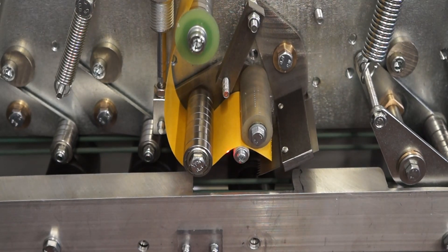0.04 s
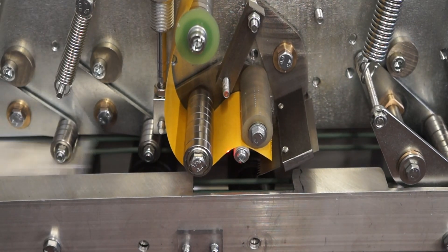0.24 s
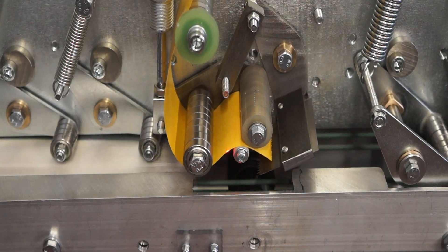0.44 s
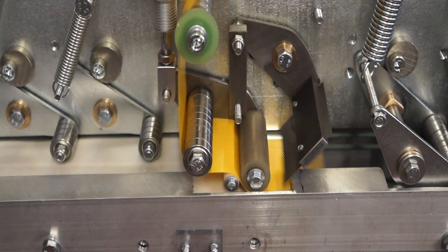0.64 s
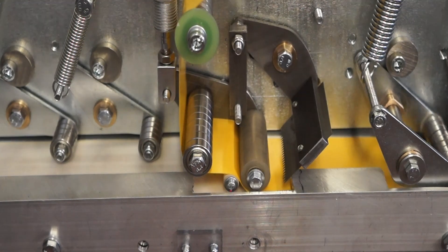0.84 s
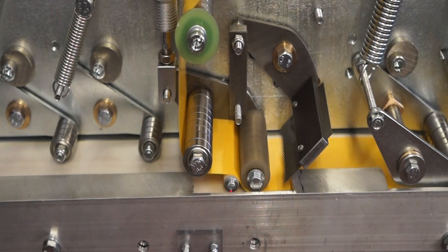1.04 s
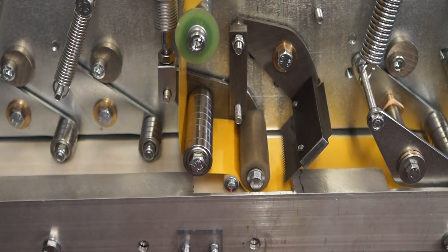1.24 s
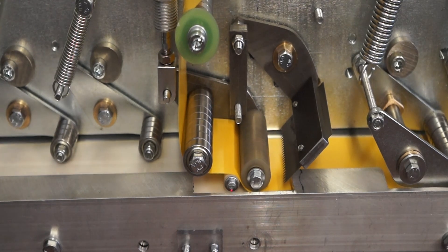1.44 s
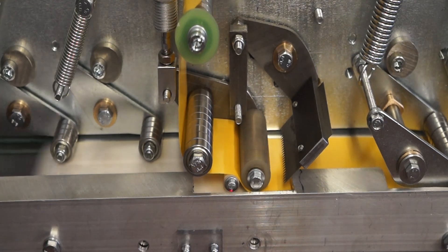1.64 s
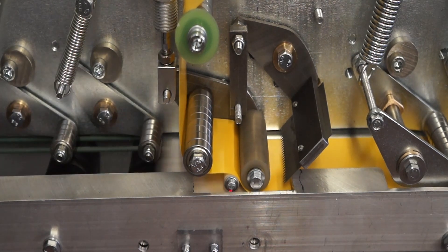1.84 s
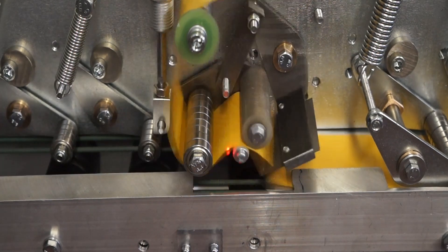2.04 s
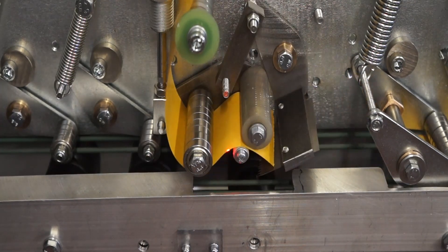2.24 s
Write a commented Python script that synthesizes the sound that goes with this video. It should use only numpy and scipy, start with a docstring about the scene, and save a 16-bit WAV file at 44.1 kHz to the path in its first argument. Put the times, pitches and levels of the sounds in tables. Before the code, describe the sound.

Sticky tape crackles off a machine's roll between the clacks of a steel applicator arm.

```python
"""Sticky tape crackles off the roll of an applicator, close up in a workshop: threads of glue let go
in thousands of tiny snaps. First the steel arm clacks down on a board that scrapes in; the rollers
rumble and knock as the tape runs, then the arm snaps back up and the frame shudders.
Behind it a small air leak hisses and whistles over the hum of the machines."""
import sys
import numpy as np
from scipy import signal
from scipy.fft import rfft, irfft, next_fast_len
from scipy.io import wavfile
from scipy.ndimage import map_coordinates

SR = 44100
rng = np.random.default_rng(int(sys.argv[2]) if len(sys.argv) > 2 else 0)


def file_out(sig):
    """Save sig as 16-bit WAV at sys.argv[1]."""
    # one column per channel
    cols = np.atleast_2d(sig).T
    # limit, then scale
    lim = np.clip(cols, -1, 1)
    pcm = np.round(lim * 32767).astype(np.int16)
    wavfile.write(sys.argv[1], SR, pcm)


N = 105840


def amp(db):
    """Decibels to gain."""
    return 10 ** (np.asarray(db) / 20)


def unit(x):
    """Scale to rms 1."""
    return x / np.sqrt(np.mean(x ** 2) + 1e-20)


def along(points, hz):
    """Read a curve of (f/Hz, value) points on a log frequency axis."""
    f, v = np.transpose(points)
    return np.interp(np.log(hz + 1), np.log(f + 1), v)


def fader(points):
    """Gain per sample from (t/s, level/dB) points."""
    return amp(np.interp(np.arange(N) / SR, *np.transpose(points)))


def wobble(hz):
    """A smooth random curve with hz knots a second."""
    return map_coordinates(rng.standard_normal(2000), [np.arange(N) * hz / SR], mode="wrap")


def swell(s, width_s):
    """A bell-shaped rise and fall around time s."""
    return np.exp(-((np.arange(N) / SR - s) / width_s) ** 2 / 2)


def strike(s, t60, attack_s):
    """Time since a blow at s, and its envelope."""
    t = np.maximum(np.arange(N) / SR - s, 0)
    decay = np.exp(-np.log(1000) * np.minimum(t / t60, 2)) * (t < 2 * t60)
    return t, decay * (1 - np.exp(-t / attack_s))


def filtered(x, response):
    """Filter x by a gain given as a function of frequency."""
    size = next_fast_len(N + SR // 2)
    return irfft(rfft(x, size) * response(np.fft.rfftfreq(size, 1 / SR)), size)[..., :N]


def colour(x, eq):
    """Minimum-phase EQ from (f/Hz, level/dB) points, scaled to rms 1."""
    def response(hz):
        cepstrum = irfft(np.log(amp(along(eq, hz))))
        cepstrum[len(cepstrum) // 2:] = 0
        return np.exp(2 * rfft(cepstrum) - cepstrum[0])
    return unit(filtered(x, response))


def noise(eq):
    """Coloured noise of rms 1."""
    return colour(rng.standard_normal(N), eq)


def tones(rows, waver):
    """Sines from (f/Hz, level/dB) rows; their phase wanders by about waver radians."""
    t = np.arange(N) / SR
    return sum(np.sqrt(2) * amp(db) * np.sin(2 * np.pi * hz * t + waver * wobble(10)) for hz, db in rows)


def room(x):
    """The workshop's diffuse tail, ringing longest in the treble."""
    decay = [(200, 0.13), (2000, 0.23), (5000, 0.35), (10000, 0.2)]  # reverb time: f/Hz, t60/s
    hz, t, spectrum = signal.stft(rng.standard_normal(SR // 2), SR, nperseg=256)
    fade = np.exp(-np.log(1000) * t / along(decay, hz)[:, None])
    tail = signal.istft(spectrum * fade, SR, nperseg=256)[1]
    return signal.fftconvolve(x, tail / np.linalg.norm(tail))[:N]


def machines():
    """Workshop machines lay down a bed of noise and a faint hum."""
    bed_eq = [(25, -21), (70, -11.5), (105, -14.5), (130, -3), (175, -1), (250, 3.5), (300, 5.5),
              (345, 2.5), (410, -8.5), (570, 2), (700, 0), (1000, -4.5), (1450, -4), (1800, 3),
              (2400, -2.5), (3200, -2.5), (4600, -15), (6500, -10.5), (11000, -12)]  # machine noise: f/Hz, level/dB
    bed_ride = [(0, -42), (.55, -37), (.66, -45), (2.1, -41.5), (2.3, -45.5)]  # its loudness: t/s, level/dB
    hum = [(154, -75), (227, -59.5), (276, -61)]  # hum lines: f/Hz, level/dB
    return noise(bed_eq) * fader(bed_ride) + tones(hum, waver=.8)


def air_leak():
    """Escaping air hisses and whistles."""
    hiss_eq = [(2000, -16), (5000, -0.5), (6900, -3.5), (7300, 11), (8000, 11), (8700, 8), (9300, -18),
               (11000, -25)]  # hiss: f/Hz, level/dB
    whistles = [(1803, -12), (2169, -10), (3257, -16), (7144, -11.5), (7246, -10.5), (8010, -11),
                (8672, -8.5)]  # whistles: f/Hz, level/dB relative to the hiss
    ride = [(0, -37), (.65, -48), (2.1, -43), (2.3, -55.5)]  # loudness of both: t/s, level/dB
    return (noise(hiss_eq) + tones(whistles, waver=.24)) * fader(ride)


def board():
    """The board scrapes under the first roller and rumbles unevenly through."""
    rumble_eq = [(40, -16), (90, -11.5), (130, -1), (175, -2), (260, 8), (310, -4.5), (430, 3.5),
                 (510, -5.5), (610, 2.5), (720, -3), (1000, 1), (1700, -4.5), (3000, -2), (9000, -18)]  # board on rollers: f/Hz, level/dB
    rumble_ride = [(.2, -42), (.3, -30), (.39, -51), (.43, -31.5), (.52, -34), (.6, -41), (.64, -49),
                   (.87, -49.5), (.95, -36), (1.1, -33.5), (1.22, -39.5), (1.33, -33.5), (1.45, -41),
                   (1.65, -45.5), (1.9, -36.5), (1.98, -42), (2.13, -35), (2.24, -48.5), (2.28, -56)]  # its loudness: t/s, level/dB
    scrape_eq = [(300, -15), (1200, -2), (1700, 7), (2100, -3.5), (2550, -9), (3400, -3), (5000, -1),
                 (11000, -11.5)]  # sliding friction: f/Hz, level/dB
    swing_db, scrape_db = 3.2, -31.5
    rumble = unit(noise(rumble_eq) * amp(swing_db * np.tanh(wobble(hz=50))))
    scrape = amp(scrape_db + 2.1 * wobble(hz=78.5)) * swell(.466, width_s=.039) * noise(scrape_eq)
    return rumble * fader(rumble_ride) + scrape


def knocks():
    """Arm, board and rollers knock: each a well damped resonance with a rattle around it."""
    hits = [(.2372, -15, 2600, .03), (.254, -17, 1077, .04), (.4008, -12, 1520, .013),
            (.405, -23, 570, .03), (.5628, -10, 540, .015), (.912, -23.5, 620, .04), (.953, -26, 440, .04),
            (1.105, -28, 740, .04), (1.252, -29, 480, .035), (1.315, -28, 1000, .05),
            (1.326, -26, 480, .05), (1.723, -23, 1800, .025), (1.724, -28, 700, .035),
            (1.8765, -7.5, 1570, .016), (1.879, -27, 580, .04), (2.0362, -14.5, 540, .015),
            (2.064, -17, 1750, .025), (2.083, -18, 3150, .025), (2.233, -34, 900, .04)]  # knocks: t/s, level/dB, f/Hz, t60/s
    rattle_db, rattle_width = -5.5, .5  # width in natural-log frequency
    out = np.zeros(N)
    for s, db, hz, t60 in hits:
        t, env = strike(s, t60, attack_s=.0005)
        band = lambda f: 1 / (1 + (np.log((f + 1) / hz) / rattle_width) ** 2) ** 2
        rattle = unit(filtered(rng.standard_normal(N), band))
        out += amp(db) * env * (np.sin(2 * np.pi * hz * t) + amp(rattle_db) * rattle)
    low_cut = signal.butter(2, 270, "high", fs=SR, output="sos")  # small parts radiate little bass
    return signal.sosfilt(low_cut, out)


def frame():
    """The frame shudders in a few low modes."""
    shudders = [(0.255, -18.5), (1.321, -35.5), (2.361, -27.5)]  # jolts: t/s, level/dB
    modes = [(230.8, -3, 0.19), (275, -4, 0.1), (334, -17.5, 0.46)]  # frame modes: f/Hz, level/dB, t60/s
    out = np.zeros(N)
    for s, db in shudders:
        for hz, mode_db, t60 in modes:
            t, env = strike(s, t60, attack_s=.0052)
            out += amp(db + mode_db) * env * np.sin(2 * np.pi * hz * t)
    return out


def arm():
    """Each clack of the arm stirs the crowded modes of the steelwork; hard little contacts tick."""
    clacks = [(0.2377, -35, -32, -18, 0.13), (0.2509, -27.5, -29, -20.5, 0.15),
              (0.401, -33.5, -37, -22.5, 0.053), (0.562, -31, -21.5, -15.5, 0.078),
              (0.573, -40, -25, -21, 0.059), (0.5914, -19, -24, -17.5, 0.0078),
              (0.5961, -23.5, -35, -14, 0.0036), (0.601, -49, -44, -24, 0.013),
              (2.037, -31, -30.5, -19, 0.091), (2.058, -31.5, -38, -24, 0.24),
              (2.351, -47, -38.5, -38, 0.23)]  # steel blows: t/s, low level/dB, mid level/dB, high level/dB, t60/s
    low_eq = [(60, -57), (180, -14.5), (330, 7.5), (480, -3.5), (590, 4), (730, 5.5), (1050, 6.5),
              (1600, -5.5), (4000, -89)]  # body of the steel: f/Hz, level/dB
    mid_eq = [(300, -25), (900, -15), (1400, -9), (1900, 3), (3000, -13), (4500, -20), (9000, -51)]  # its clang: f/Hz, level/dB
    high_eq = [(1200, -17), (2400, -5.5), (4500, -0.5), (7500, -1), (8800, 0), (11000, -14)]  # its sizzle: f/Hz, level/dB
    ticks = [(.2393, -11, 5700, .012), (.5576, -.5, 6900, .009), (.5619, -7, 7600, .007),
             (.5914, 1, 7700, .004), (.5957, 1.5, 7500, .005), (2.0302, -1.5, 7700, .011),
             (2.353, -28, 4750, .012)]  # metal contacts: t/s, level/dB, f/Hz, t60/s
    clack_crack_db, tick_crack_db = -1, -15
    low, mid, high = noise(low_eq), noise(mid_eq), noise(high_eq)
    out = np.zeros(N)
    for s, low_db, mid_db, high_db, t60 in clacks:
        steel = amp(low_db) * low + amp(mid_db) * mid + amp(high_db) * high
        steel = np.roll(steel, rng.integers(N))  # fresh grain for every blow
        _, ring = strike(s, t60, attack_s=.0001)
        _, crack = strike(s, t60=.004, attack_s=.0001)
        out += steel * (ring + amp(clack_crack_db) * crack)
    for s, db, hz, t60 in ticks:
        t, env = strike(s, t60, attack_s=.0003)
        out += amp(db) * env * (np.sin(2 * np.pi * hz * t) + amp(tick_crack_db) * high)
    return out


def steel_echoes(x):
    """Near echoes off the steelwork; their delays drift as the peeling line wanders."""
    reflections = [(.00091, -.1), (.00231, -.07), (.00484, -.09), (.00497, .13)]  # echoes: delay/s, gain
    echoes = np.zeros(N)
    for delay_s, gain in reflections:
        drift = 1 + .02 * wobble(hz=4)
        echoes += gain * map_coordinates(x, [np.arange(N) - delay_s * SR * drift])
    return x + echoes


def glue_snaps(per_s):
    """Threads of glue let go: tiny damped pings of random moment and pitch and very uneven size."""
    low_hz, high_hz, spread_db, snap_s = 200, 11800, 5.6, .00018
    when, pitch, phase, size = rng.random((int(per_s * N / SR), 4)).T[..., None]
    t = np.arange(80) / SR
    hz = low_hz + pitch * (high_hz - low_hz)
    gain = amp(-spread_db * np.log(size + .1))
    pings = gain * t * np.exp(-t / snap_s) * np.sin(2 * np.pi * (hz * t + phase))
    samples = (when * N).astype(int) + np.arange(len(t))
    return np.bincount(samples.ravel(), pings.ravel(), N)[:N]


def tape():
    """Tape unwinds unevenly in a bright crackle whose two bands drift apart; it squeaks once."""
    peel_eq = [(300, -72), (1000, -33), (1800, -16), (2700, -11), (3900, -4), (5000, -4), (7300, -2),
               (8400, -2), (9400, -13.5), (11000, -14)]  # crackle: f/Hz, level/dB
    peel_ride = [(.21, -71), (.23, -37), (.33, -34), (.38, -35), (.49, -28.5), (.62, -39), (.69, -36),
                 (.73, -28.5), (.82, -24.5), (.9, -18.5), (.928, -26), (.946, -18), (1.06, -22.5),
                 (1.078, -26), (1.09, -20.5), (1.2, -20.5), (1.38, -20.5), (1.58, -21), (1.78, -21),
                 (1.84, -21), (1.92, -23), (2.003, -17), (2.026, -22.5), (2.07, -23.5), (2.11, -47),
                 (2.2, -46)]  # loudness of the unwinding: t/s, level/dB
    lower_ride = [(.3, -0.5), (.5, -4), (.78, -2), (.98, -4), (1.05, 2.5), (1.13, -4), (1.225, 0),
                  (1.28, -3.5), (1.375, 2), (1.45, -2.5), (1.52, 1), (1.57, -4), (1.67, 0), (1.78, -3.5),
                  (1.835, 2), (1.92, -2), (2.04, -6)]  # lift and dip of the band below the split: t/s, level/dB
    split_hz, drift_db = 6300, .4
    judder_hz, judder_db = 120, 1.6
    squeak_hz, squeak_db = 2834, -29
    crackle = colour(glue_snaps(per_s=4800), peel_eq)
    lower = filtered(crackle, lambda hz: 1 / (1 + (hz / split_hz) ** 10))
    upper = crackle - lower
    lower = lower * fader(lower_ride) * amp(drift_db * wobble(hz=21.6))
    upper = upper * amp(drift_db / 2 * wobble(hz=23.3))
    squeak = tones([(squeak_hz, squeak_db)], waver=5.4) * swell(1.04, width_s=.007)
    judder = amp(judder_db * np.tanh(wobble(judder_hz)))
    return unit((lower + upper) * judder) * fader(peel_ride) + squeak


def scene():
    """The applicator in its room; a little phase-scattered sound widens the near-mono image."""
    side_eq = [(30, -14), (70, -17), (150, -9.5), (280, -8), (500, -1), (2000, 1), (4000, -1.5), (8000, -1)]  # stereo side signal: f/Hz, level/dB
    room_db, width_db, balance_db = -5.5, -17.5, .24  # balance: left over right
    applicator = steel_echoes(tape()) + board() + arm() + frame() + knocks()
    mid = applicator + amp(room_db) * room(applicator) + air_leak() + machines()
    spectrum = signal.stft(mid, nperseg=256)[2]
    scatter = np.exp(2j * np.pi * rng.random(spectrum.shape))
    diffuse = signal.istft(2 * spectrum * scatter, nperseg=256)[1][:N]
    side = filtered(diffuse, lambda hz: amp(width_db + along(side_eq, hz)))
    return np.array([(mid + side) * amp(balance_db / 2), (mid - side) * amp(-balance_db / 2)])


def record(dry):
    """A soft clip rounds the loudest peaks; a steep high cut takes off the top."""
    ceiling, top_hz = .8, 11080
    rounded = dry / (1 + (dry / ceiling) ** 6) ** (1 / 6)
    return filtered(rounded, lambda hz: np.clip((top_hz - hz) / 100, 0, 1))


dry = scene()
out = record(dry)
file_out(out)
```